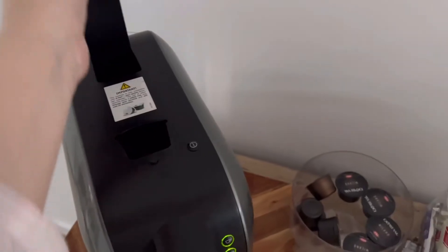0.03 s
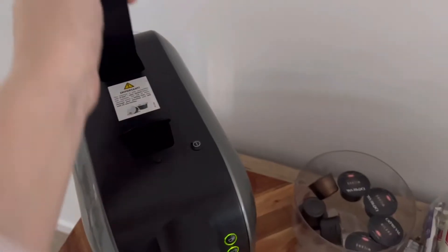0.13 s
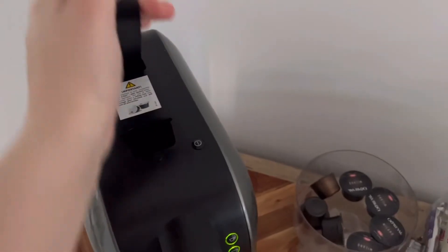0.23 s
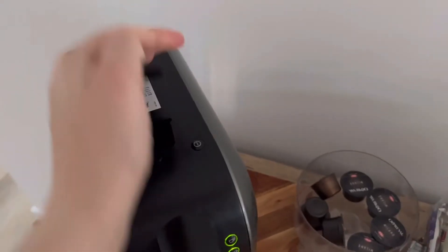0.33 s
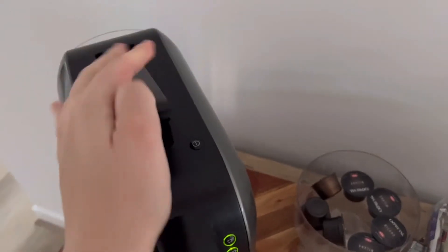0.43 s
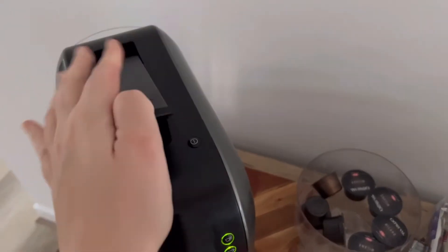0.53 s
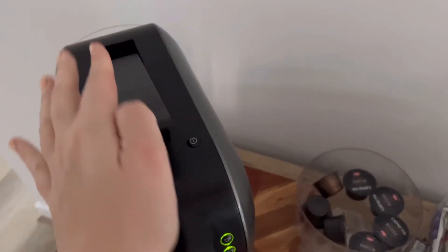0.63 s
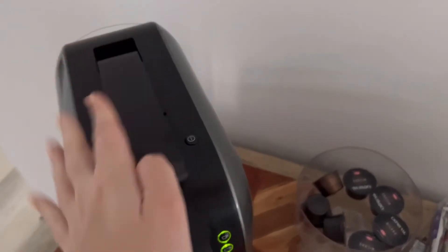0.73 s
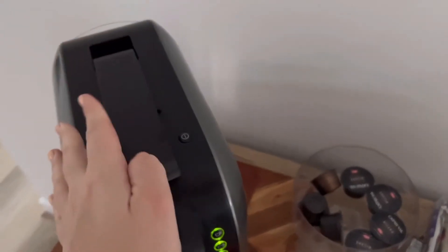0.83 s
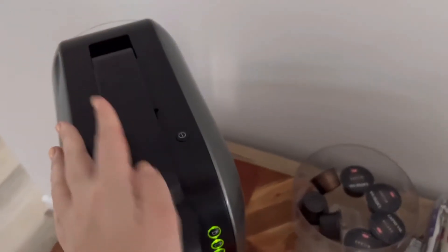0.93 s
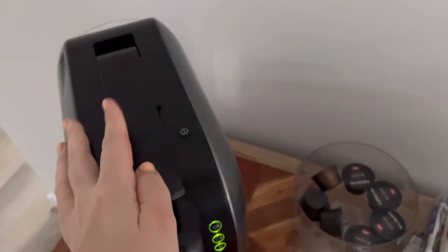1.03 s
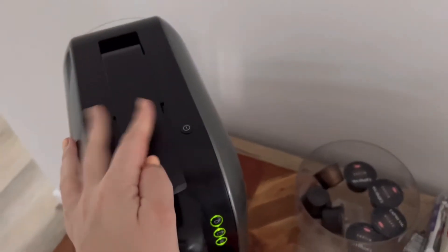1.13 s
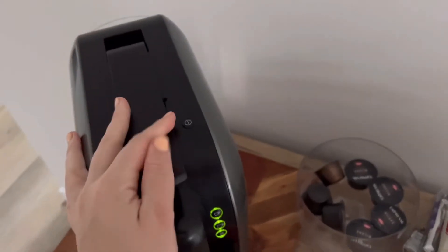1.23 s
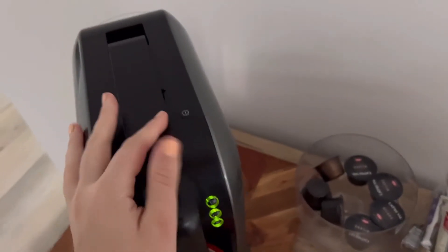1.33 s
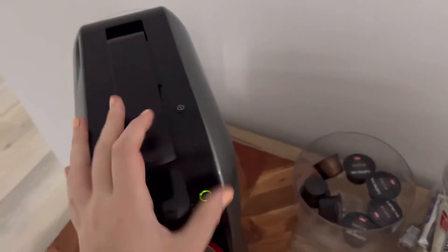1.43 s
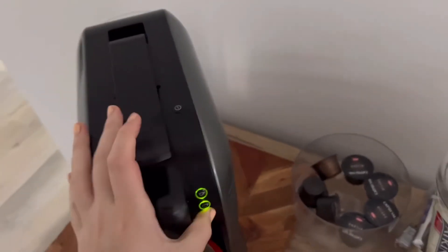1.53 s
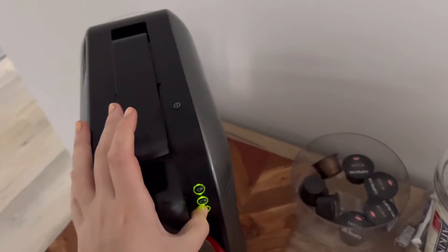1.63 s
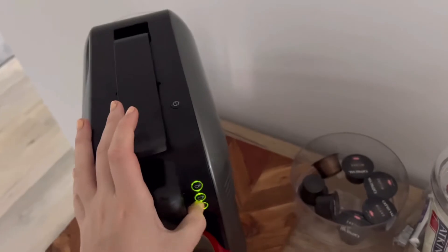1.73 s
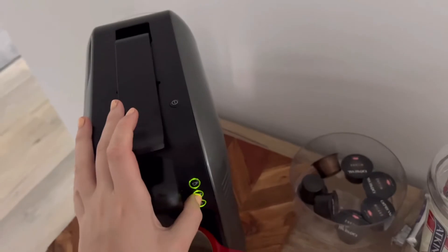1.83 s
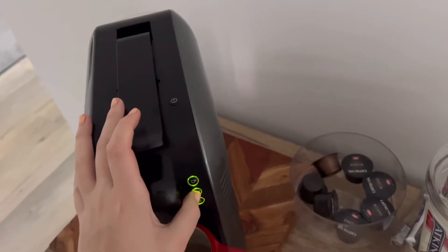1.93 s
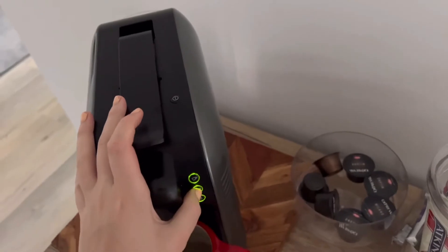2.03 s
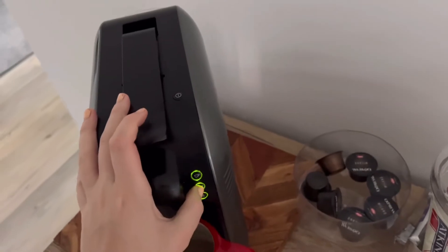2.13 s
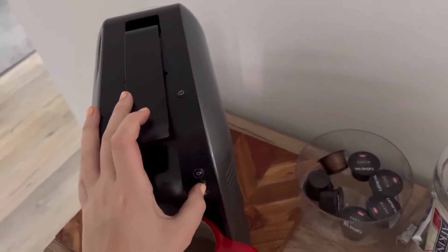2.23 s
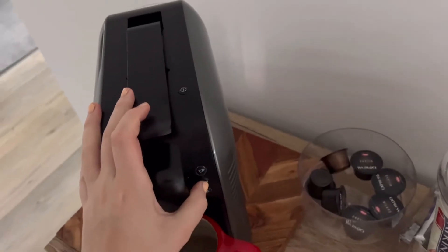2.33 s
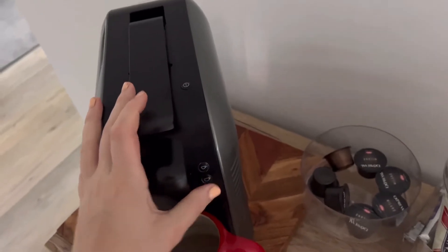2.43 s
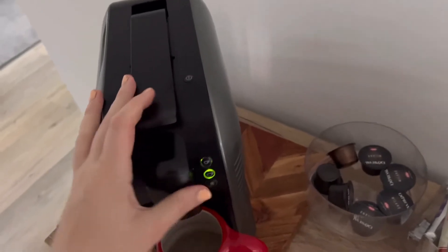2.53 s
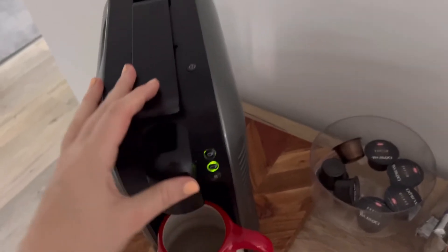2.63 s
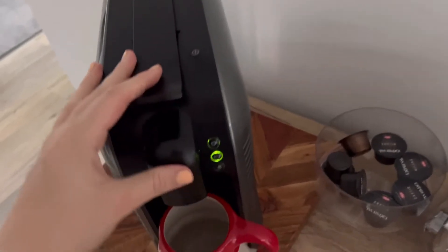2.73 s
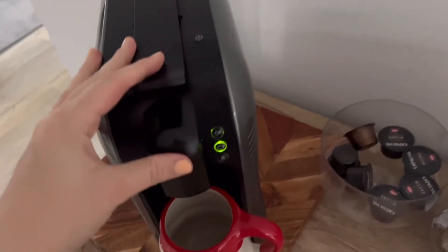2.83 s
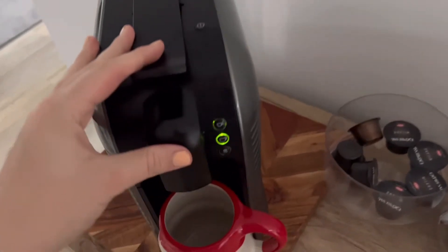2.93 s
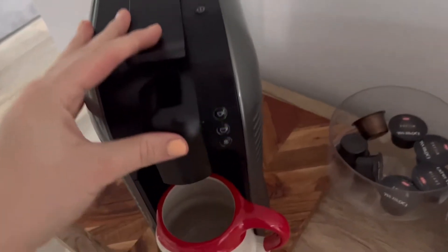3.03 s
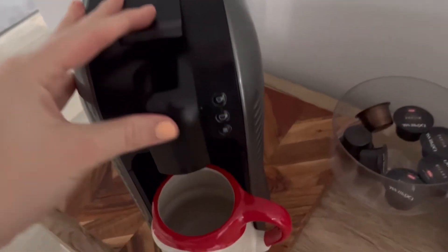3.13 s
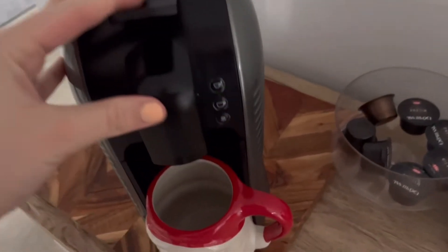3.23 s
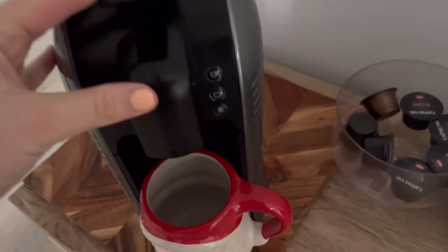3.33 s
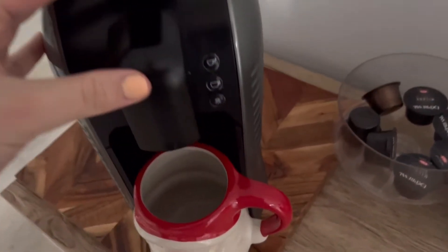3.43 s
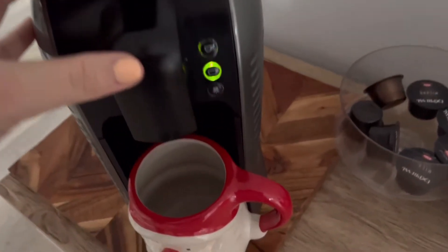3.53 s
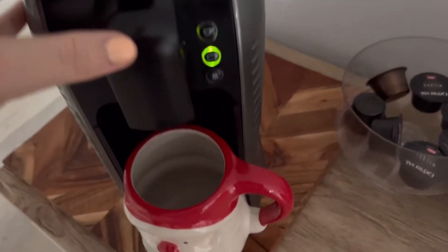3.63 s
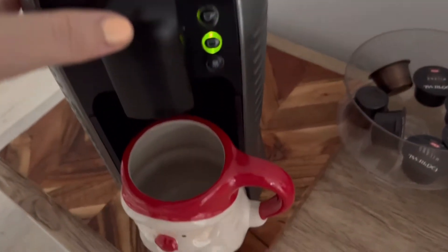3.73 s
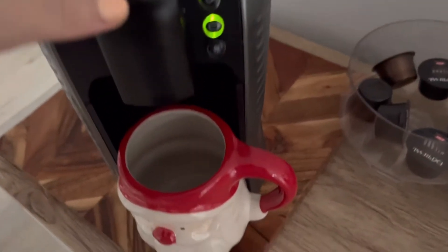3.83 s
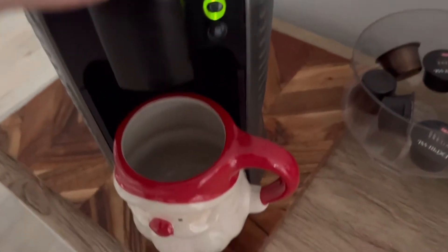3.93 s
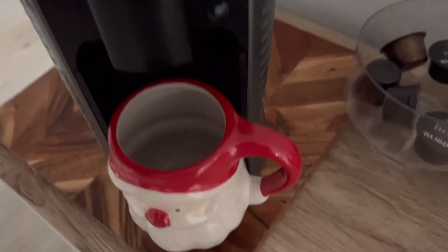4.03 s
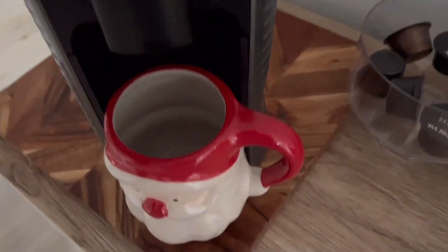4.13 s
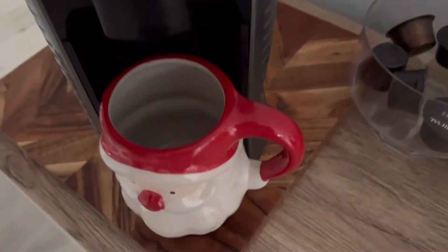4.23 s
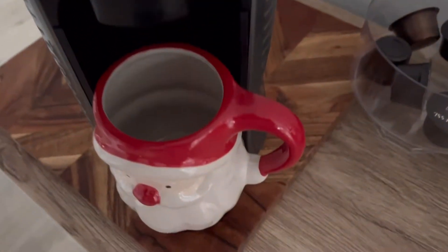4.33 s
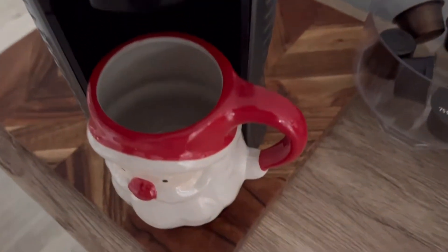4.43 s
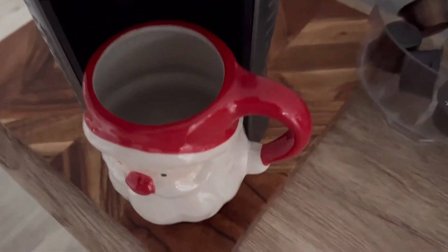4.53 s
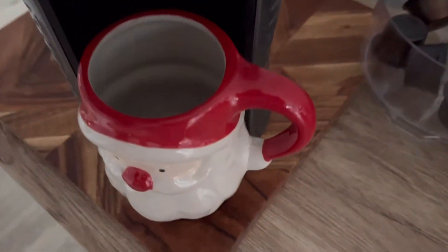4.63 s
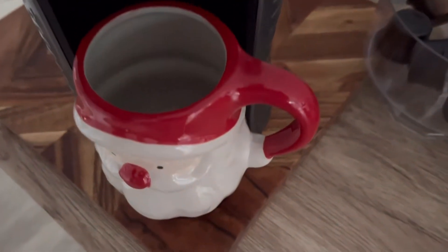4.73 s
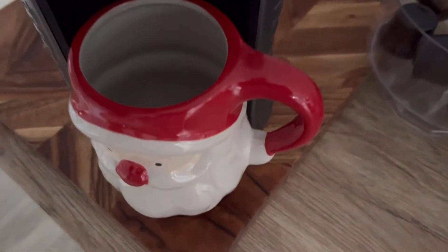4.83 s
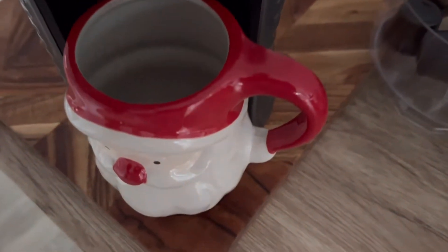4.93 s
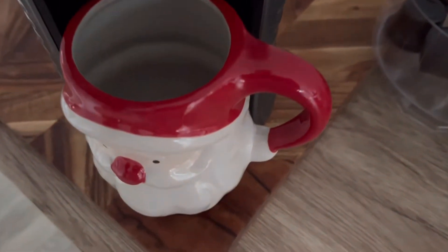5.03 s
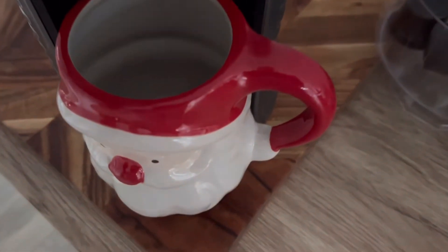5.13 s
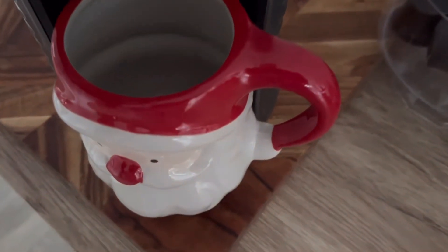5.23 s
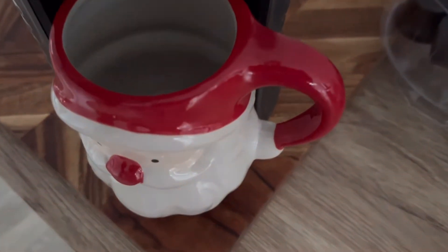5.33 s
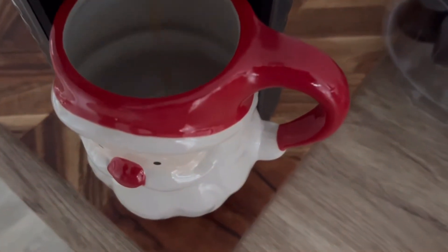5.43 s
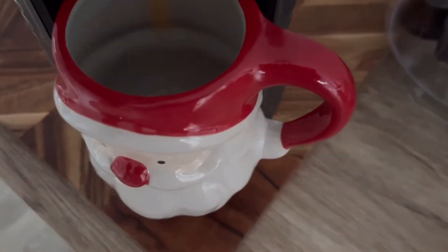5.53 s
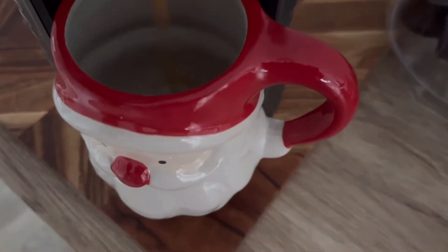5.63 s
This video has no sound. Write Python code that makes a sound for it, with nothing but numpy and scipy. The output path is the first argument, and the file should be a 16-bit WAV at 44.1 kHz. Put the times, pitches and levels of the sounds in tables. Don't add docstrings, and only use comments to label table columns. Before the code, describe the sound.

Close stereo phone pickup of a capsule machine: brief hinge rub, hard plastic latch clicks, hollow housing thumps and a heavy slam within about a second. Faint hand touches follow over low room rumble, then a soft button click. A mains-rate pump buzzes continuously, rattling and hissing with tiny squeaks, its tone shifting as the phone moves down to the cup; the bright kitchen echoes briefly.

```python
import sys
import numpy as np
from scipy import signal
from scipy.fft import rfft, irfft, next_fast_len
from scipy.io import wavfile
from scipy.ndimage import uniform_filter1d

SR = 44100
rng = np.random.default_rng(int(sys.argv[2]) if len(sys.argv) > 2 else 0)


def unload_audio(sound):
    columns = np.transpose(np.atleast_2d(sound))
    steps = np.round(np.clip(columns, -1, 1) * 32767)
    wavfile.write(sys.argv[1], SR, steps.astype(np.int16))


def voltage_ratio(decibels):
    exponent = np.asarray(decibels, float) / 20
    return 10 ** exponent


N = 250929
T = np.arange(N) / SR
MAINS_HZ = 50.052
AT_CUP_S = (4.3, 5.1)


def noise(size=N):
    return rng.standard_normal(size)


def curve(table, hz):
    points_hz, values = np.array(table).T
    return np.interp(np.log(hz + 1), np.log(points_hz), values)


def unit(x):
    return x / np.sqrt(np.mean(x ** 2))


def colour(x, table):
    n = next_fast_len(len(x), True)
    gain = voltage_ratio(curve(table, np.fft.rfftfreq(n, 1 / SR)))
    return irfft(rfft(x, n) * gain, n)[:len(x)]


def ring(x, hz, width_hz):
    r = np.exp(-np.pi * width_hz / SR)
    return signal.lfilter([1 - r, 0, r - 1], [1, -2 * r * np.cos(2 * np.pi * hz / SR), r * r], x)


def body(x, modes, widen):
    out = 0
    for k, (hz, width_hz, db) in enumerate(modes):
        out = out + (-1) ** k * voltage_ratio(db) * ring(x, hz, width_hz * widen)
    return out


def ramp(start_s, end_s):
    return np.clip((T - start_s) / (end_s - start_s), 0, 1)


def walk(rate_hz):
    step = 16
    k = int(SR / rate_hz / step)
    coarse = uniform_filter1d(uniform_filter1d(noise(N // step + 1), k), k)
    return np.interp(T, np.arange(len(coarse)) * step / SR, unit(coarse))


def burst(length_s):
    t = T[:8192] / np.clip(length_s, 3e-4, .05)
    return noise(len(t)) * (1 - np.exp(-t / 0.3)) * np.exp(-t)


def add(out, s, peak_db, x):
    i = int(s * SR)
    out[i:i + len(x)] += (x * voltage_ratio(peak_db) / np.abs(x).max())[:N - i]


# (time [s], air level [dB])
HANDLING = [(0.0, -45.5), (0.15, -50), (0.35, -33.5), (0.48, -55), (0.69, -43), (0.81, -49), (1.1, -35.5),
            (1.33, -52), (1.45, -58.5), (1.54, -65), (1.85, -65.5), (2.07, -64.5), (2.16, -50.5),
            (2.2, -49)]
# (frequency [Hz], density [dB per Hz])
AIR = [(88, -21.5), (150, -3), (194, -6), (522, -14), (1430, -27), (1920, -28.5), (3090, -38.5),
       (8170, -41.5), (10200, -62), (12000, -57.5), (15600, -80.5), (22000, -120)]
# (time [s], frequency [Hz])
MOTOR = [
    (0, 56.8),
    (.4, 55.8),
    (.8, 57.6),
    (1.06, 59.9),
]


def murmur():
    released = ramp(1.45, 1.54)
    air_db = np.interp(T, *np.transpose(HANDLING))
    rumble_db = -52.5 + 0.091 * (air_db - air_db.min())
    rumble_db = rumble_db + 6 * (1 - released) - 14 * ramp(2.05, 2.16)
    motor_hz = np.interp(T, *np.transpose(MOTOR))
    rumble = unit(np.sin(2 * np.pi * np.cumsum(motor_hz) / SR) * voltage_ratio(2.2 * walk(9)))
    for hz, width_hz, db in [(84, 70, -7), (36, 25, -12)]:
        rumble += voltage_ratio(db) * unit(ring(ring(noise(), hz, width_hz), hz, width_hz))
    mid, side = (unit(colour(noise(), AIR)) * voltage_ratio(1.6 * walk(4)) for _ in range(2))
    side = signal.sosfilt(signal.butter(1, 900, "high", fs=SR, output="sos"), side)
    air = mid + .9 * side * np.array([[1], [-1]])
    treble = signal.sosfilt(signal.butter(2, 2400, "high", fs=SR, output="sos"), air)
    air += (voltage_ratio(-3.5 * released) - 1) * treble
    port_db = np.array([[-.9], [.9]])
    return voltage_ratio(rumble_db + port_db) * rumble + voltage_ratio(air_db) * air


# (frequency [Hz], width [Hz], level [dB])
HINGE = [(278, 14, 26), (2640, 80, 1), (4110, 90, -13), (6375, 400, -9), (7520, 160, -14)]


def hinge():
    return voltage_ratio(-52 + 3.86 * walk(38)) * (T < 0.182) * unit(body(noise(), HINGE, 0.88))


def thuds(events, ring_t60_s, push_s):
    out = np.zeros(N)
    t = T[:16384]
    width_hz = np.log(1000) / np.pi / ring_t60_s
    for s, db, hz in events:
        push = np.exp(-(t / push_s - 1) ** 2 * 4) * np.cos(2 * np.pi * hz * t)
        push[:8192] += 0.63 * ring(burst(2 * push_s), 380, 600)
        panel = ring(push, hz, width_hz)
        panel += 0.32 * ring(push, 1.6 * hz, 55) + 0.03 * ring(push, 4.8 * hz, 120)
        add(out, s, db + 0.24, panel)
    return out


# (time [s], peak level [dB], ring frequency [Hz])
ROCKS = [(0.009, -37, 269), (0.579, -52.5, 148), (0.791, -24, 186.9), (1.021, -21, 193.8),
         (1.114, -15, 185.7), (1.19, -24.5, 180.3), (1.246, -31, 198.4), (1.739, -58.5, 151.1),
         (1.836, -61, 156.1), (1.935, -62.5, 154.3), (2.116, -34.5, 126.6), (2.21, -26.5, 196.3),
         (2.291, -32, 202.3)]
# (time [s], peak level [dB], ring frequency [Hz])
KNOCKS = [(0.173, -30, 396.7), (0.195, -24.5, 270), (0.266, -22, 371), (0.272, -28, 646),
          (0.284, -19, 360.6), (0.296, -29.5, 705.5), (0.308, -28.5, 391.5), (0.349, -20, 244),
          (0.4, -32.5, 235), (0.57, -32, 102), (0.645, -27.5, 194), (0.666, -16, 371), (0.673, -13, 299.2),
          (0.679, -15, 362), (0.687, -14, 283), (0.7, -19.5, 263.7), (0.741, -24.5, 75),
          (0.724, -27.5, 331), (0.728, -30, 488.7), (0.737, -21.5, 105), (1.075, -30, 350),
          (1.16, -29.5, 383.8), (0.875, -35, 361.7), (0.999, -22, 181), (1.03, -24.5, 70.7),
          (1.143, -25.5, 78.8), (1.308, -32, 227.5), (1.386, -37.5, 78.9), (2.101, -38, 504),
          (2.11, -36.5, 361), (2.119, -32.5, 252), (2.184, -20.5, 378.4), (2.226, -23.5, 399.5),
          (2.328, -26, 262), (2.367, -26, 249.5)]
# (time [s], peak level [dB], ring frequency [Hz])
TOUCHES = [(0.683, -20.5, 124.4), (0.345, -29.5, 120), (0.805, -28.5, 190), (1.405, -41, 340),
           (1.476, -49.5, 479.2), (1.725, -54.5, 399.7), (1.765, -52.5, 373), (1.795, -52.5, 360.3),
           (2.03, -59, 650), (0.565, -38, 400), (1.04, -35, 270), (1.09, -36, 480), (1.122, -33, 360),
           (1.2, -42, 600)]
# (time [s], peak level [dB], ring frequency [Hz])
SLAMS = [
    (0.9221, 3, 256.7),
    (0.939, -10.5, 109),
    (0.944, -9.5, 228.2),
    (0.962, -12.5, 300),
    (0.98, -18.5, 309.7),
]


def knocks():
    dull = thuds(ROCKS, ring_t60_s=.11, push_s=.006)
    dull += thuds(KNOCKS, ring_t60_s=.052, push_s=.0035)
    dull += thuds(TOUCHES, ring_t60_s=.052, push_s=.0035)
    dull += thuds(SLAMS, ring_t60_s=.024, push_s=.004)
    return colour(dull, [(1200, -2.0), (3000, -23.5)])


# (frequency [Hz], density [dB per Hz])
SHELL = [(290, -31), (500, -7), (2380, -17), (2630, -13.5), (3950, -17.5), (4300, -17), (6740, -13),
         (7240, -21.5), (8740, -17), (9950, -32), (11500, -25.5), (13900, -43.5), (15800, -28.5)]


def clicks(events, rings):
    near, wash = np.zeros((2, N))
    lead = 64
    for s, db, treble_db, length_s in events:
        tilt = [(600, 0.0083), (3000, 0.0028), (6000, treble_db + 4.0), (16000, treble_db + 9.5)]
        puff = colour(np.roll(burst(length_s), lead), SHELL)
        add(near, s - lead / SR, db - 0.5, colour(puff + 0.9 * body(puff, rings, 0.35), tilt))
        impulse = colour(signal.unit_impulse(1024, lead), SHELL)
        add(wash, s - lead / SR, db + 0.33, colour(impulse, tilt))
    return near, wash


# (time [s], peak level [dB], treble [dB], length [s])
CRACKS = [(0.017, -48.5, -16, 0.0039), (0.165, -38.5, -21, 0.0035), (0.179, -39.5, -23, 0.0056),
          (0.22, -31.5, -14, 0.00186), (0.247, -44, -35, 0.0032), (0.253, -34.5, -43.5, 0.0106),
          (0.266, -21, -16, 0.0096), (0.275, -29, -25, 0.0081), (0.534, -52, -28.5, 0.0021),
          (0.562, -32, -21, 0.0043), (0.644, -41.5, -34, 0.004), (0.664, -17.5, -11.5, 0.0072),
          (0.669, -25, -10.5, 0.0078), (0.851, -45, -25, 0.0055), (0.888, -57.5, 24, 0.0038),
          (0.293, -28.5, -4, 0.0046), (0.91, -30, -4, 0.0074), (0.919, -2, -0.5, 0.00298),
          (0.923, -6.5, -16.5, 0.0035), (1.109, -37.5, -39, 0.0047), (1.312, -42, -30, 0.002),
          (1.577, -59.5, -5, 0.00403), (1.735, -46, -14.5, 0.00926), (1.759, -53, -21.5, 0.0155),
          (2.185, -33, -27.5, 0.0037), (2.296, -30.5, -20.5, 0.0042), (2.845, -29, -10, 0.0078),
          (3.189, -51, -5, 0.0016), (4.102, -26, -4, 0.00384), (5.579, -28, -2, 0.004)]
# (frequency [Hz], width [Hz], level [dB])
PANELS = [(513.5, 48, -1), (853.4, 38, 4.5), (1010, 13, -8), (1250, 75, -6), (1420, 32, -1),
          (1646, 33, -9.5)]


def cracks():
    return clicks(CRACKS, PANELS)


# (time [s], peak level [dB], ring frequency [Hz])
PINGS = [(0.271, -27, 898), (0.322, -22, 784), (0.641, -31.5, 810), (0.666, -19, 842), (0.666, -23, 1420),
         (0.675, -31.5, 1420), (0.69, -29.5, 1010), (0.919, -13, 535), (0.919, -16.5, 852),
         (0.917, -17.5, 1250), (0.946, -23.5, 691), (0.963, -23, 612), (1.108, -31.5, 990),
         (1.118, -29, 705), (1.311, -44.5, 800), (2.101, -34.5, 1988), (2.106, -36.5, 2150),
         (2.2992, -37, 2115), (3.568, -40, 2900), (3.8281, -30, 2530), (4.107, -27, 2505)]


def pings():
    out = np.zeros(N)
    for s, db, hz in PINGS:
        add(out, s, db - 4.5, ring(ring(burst(0.0027), hz, 62), hz, 520))
    return out


# (time [s], peak level [dB], scrape length [s])
SNAPS = [
    (0.294, -27.5, 0.00124),
    (0.3191, -4.5, 0.000497),
    (0.3357, -3, 0.000275),
    (0.361, -23, 0.0006),
    (0.376, -20, 0.000294),
]
# (frequency [Hz], width [Hz], level [dB])
LATCH = [(758, 67, -14.5), (1655, 110, -7.5), (2404, 250, -14.5), (2770, 357.6, 1.5), (2859, 515, 0.5),
         (3477, 780, -14.5), (4960, 500, -25.5), (5897, 200, -14.5), (6466, 190, -16.5), (8120, 150, -19.5),
         (8700, 300, -18.5), (11330, 500, -24), (12800, 460, -29.5), (14240, 360, -26.5)]
# (frequency [Hz], width [Hz], level [dB])
SPRING = [(1600, 120, -15), (2306, 41, -3), (2637, 80, -1), (2855, 60, 1), (2995, 140, -2)]
# (frequency [Hz], density [dB per Hz])
LATCH_ECHO = [(350, -41.5), (600, -11), (1000, -26), (1560, -11), (1910, -16), (2900, -6), (3900, -23),
              (6080, -11), (9110, -16), (10200, -46.5), (11600, -21), (13800, -51.5), (15000, -36.5)]


def latch_snaps():
    near, wash = np.zeros((2, N))
    lead = 256
    fade = voltage_ratio(-60 * T[:SR // 2])
    for s, db, length_s in SNAPS:
        add(near, s, db - 0.5, body(burst(length_s), LATCH, 0.65))
        add(near, s, db - 26, body(noise(SR // 2) * fade, SPRING, 1.1))
        add(wash, s - lead / SR, db, colour(signal.unit_impulse(2048, lead), LATCH_ECHO))
    return near, wash


# (frequency [Hz], width [Hz], level [dB])
CREAK = [(1890, 100, 0), (3350, 130, 0)]


def button_creak():
    return voltage_ratio(-75) * ramp(1.944, 2.1) * (T < 2.1) * unit(body(noise(), CREAK, 0.92))


# (time [s], peak level [dB], treble [dB], length [s])
BUTTON = [
    (2.101, -28.5, -10.5, 0.0047),
    (2.104, -39, -26, 0.0096),
]


def button_click():
    return clicks(BUTTON, [(2100, 350, 0)])


# (time [s], count [strokes])
WEAK = [(2.39, 1), (2.49, 1), (2.61, 1), (2.65, 1), (2.69, 1), (2.77, 1), (2.91, 1), (3.15, 3), (3.25, 2),
        (3.49, 2), (3.6, 1), (3.64, 1), (3.72, 1), (4.2, 1), (4.36, 2), (4.44, 1), (4.9, 1), (5.06, 1),
        (5.1, 1), (5.6, 1)]


def strokes(parts):
    turns = MAINS_HZ * T - .32 + 1
    blow, stroke = turns % 1, turns.astype(int)
    strength = noise((stroke.max() + 1, parts + 1))
    hit_db = .7 * strength[:, -1]
    for s, count in WEAK:
        hit_db[stroke[int(s * SR) + 260] + np.arange(count)] -= 20
    gate = np.minimum(blow / .13, 1) * np.exp(-(blow / .36) ** 2) * voltage_ratio(hit_db[stroke])
    shake = voltage_ratio(1.3 * uniform_filter1d(strength, 3, axis=0)[stroke].T * 2)
    return blow, stroke, gate, shake


# (multiple of stroke rate, level [dB])
BREWING = [(1, -3.5), (2, -12.5), (3, 0), (4, -6.5), (5, 0.5), (6, -4), (7, -1), (8, -1), (9, -5), (10, -7),
           (11, -8), (12, -4.5), (13, -5), (14, -16), (15, -15), (16, -15), (17, -17.5), (18, -20),
           (19, -12), (20, -18.5), (21, -14.5), (22, -44), (23, -14), (24, -20)]
# (frequency [Hz], level [dB])
PRIMING = [(50, 0), (250, -1), (370, 2.5), (500, -0.5), (620, -2.5), (800, 0.45), (950, -3), (1080, -15.5)]
# (frequency [Hz], level [dB])
PRESSING = [(50, -2), (110, 6.5), (150, 1.5), (225, -11.5), (310, -2), (420, -0.5), (800, 0.16), (1000, -1)]
# (time [s], multiple of
# stroke rate, level [dB], span [s])
FADES = [(2.28, 1, -6, .1), (2.26, 3, -5.5, 0.172), (2.3, 4, 7, 0.117), (2.32, 5, -2.5, 0.094),
         (2.328, 8, -8, 0.28), (2.6, 5, -6.5, 0.122), (2.87, 6, -3.5, 0.46), (2.73, 15, 5, 0.19),
         (2.63, 16, 3.5, 0.132), (2.92, 11, -9, 0.11), (3.23, 8, 2, 0.247), (3.46, 17, -14.5, 0.353),
         (3.69, 11, -21.5, 0.298), (3.57, 4, 3.5, 0.31), (3.52, 14, 5, 0.83), (3.75, 20, 9, 0.36),
         (3.72, 22, 8, 0.195), (3.65, 21, 5, 0.34), (3.215, 20, 5.5, 0.147), (4.09, 17, 5, 0.206),
         (4.22, 19, -5.5, 0.29), (4.103, 8, -4, 0.25), (4.036, 7, -2.5, 0.32), (4.3, 6, 4.5, 0.104),
         (4.393, 10, -10, 0.18), (4.404, 11, 3.5, 0.178), (4.78, 12, -4.5, 0.164), (3.64, 11, -1.5, .12),
         (4.65, 4, -12.5, 0.143), (4.66, 14, -13, 0.36), (5.06, 18, -25, 0.46), (5.55, 5, -5, .15),
         (5.5, 14, -6, .2), (5.48, 16, 7, 0.64), (4.98, 22, 20, 0.57)]
GULPS_S = [
    2.63,
    2.95,
    3.25,
    3.45,
    4.72,
]


def hum(start_s):
    early, late, out = 1 - ramp(2.9, 3.9), ramp(*AT_CUP_S), 0
    rough = 0.055 + 0.26 * np.exp(-np.maximum(T - start_s, 0) / 0.21)
    rough += .13 * sum(np.exp(-((T - gulp_s) / .03) ** 2) for gulp_s in GULPS_S)
    slow = T[::256]
    for order, line_db in BREWING:
        hz = order * MAINS_HZ
        fades_db = np.zeros(len(slow))
        for s, line, fade_db, span_s in FADES:
            if round(line) == order:
                fades_db += fade_db * np.exp(-((slow - s) / span_s) ** 2)
        db = line_db + early * curve(PRIMING, hz) + late * curve(PRESSING, hz)
        db = db + np.interp(T, slow, fades_db)
        lag = order / 2 - .22 if order < 14 else order * .37 + .2
        lag += .45 * (order == 6) - .17 * (6 < order < 12) - .17 * (order == 1)
        lag += .22 * (order in (2, 19, 20)) + .1 * (order in (4, 9))
        lag = lag + .04 * noise(None) + .03 * walk(2.5)
        lag = lag + .02 * order * (order > 9) * late + .22 * late * (order in (4, 8))
        lag = lag + .12 * early * (int(order == 3) - int(order > 13))
        smear = rough * min(order / 2.7, 1) ** 2.5 * (walk(130) + 1j * walk(90))
        line = np.real((1 + smear) * np.exp(2j * np.pi * (hz * T - lag)))
        out = out + voltage_ratio(db + 0.34 * walk(8.3)) * line
    return out / np.sqrt(uniform_filter1d(out ** 2, size=SR // 5))


# (frequency [Hz], width [Hz], level [dB], frequency from the cup [Hz])
RATTLE = [(1661, 44, -3, 1600), (1923.6, 35, -3.5, 1950), (2591, 90, 4, 2640), (3060, 360, -8.5, 2673),
          (3280, 84.4, 0.5, 3290), (3660, 137, -3.5, 3509), (3933.5, 99, -1, 3300), (4332, 110, -5.5, 4200),
          (5450, 150, -13, 4800)]


def rattle(blow, gate, shake):
    same = noise(1024)[(blow * SR / MAINS_HZ).astype(int)]
    out, late = 0, ramp(*AT_CUP_S)
    for k, (hz, width_hz, db, cup_hz) in enumerate(RATTLE):
        jolt = gate * shake[k] * 0.7 * same + (1.05 * gate + 0.09) * noise()
        early_ring = ring(jolt * np.sqrt(1 - late), hz, width_hz)
        out = out + voltage_ratio(db) * (early_ring + ring(jolt * np.sqrt(late), cup_hz, width_hz))
    return unit(ring(out, 3300, 6000))


# (frequency [Hz], density [dB per Hz])
HISS = [(590, -29.5), (1000, -1.5), (1370, -5), (2100, -11.5), (2590, -8.5), (4020, -9), (5020, -15),
        (8360, -10.5), (9380, -11.5), (9800, -32.5), (10500, -30.5), (11700, -20), (12800, -24.5),
        (13900, -31), (14600, -23), (16000, -33)]


def valve_hiss(blow, gate, shake, pressure):
    back = np.exp(-((blow - .68) % 1) / 0.84)
    hiss = colour((gate + 1.54 * back + 0.24) * noise(), HISS)
    low = colour(hiss, [(9900, 0), (10300, -60)])
    top = colour(hiss * (.65 + gate * shake[0]), [(9900, -60), (10300, 0)])
    highest = colour(top, [(13600, -60), (14000, 0)])
    top += (voltage_ratio(5 - 7 * ramp(4.85, 5.0)) - 1) * highest
    top_db = -58.5 + 7 * np.exp(-((T - 3.96) / 0.616) ** 2)
    return voltage_ratio(-50.5 + 6.5 * pressure) * unit(low) + voltage_ratio(top_db) * unit(top)


SQUEAKS_S = [
    3.11,
    3.25,
    3.27,
    3.47,
    3.49,
    3.51,
    3.55,
    3.57,
    3.71,
    3.79,
]


def squeak(blow, stroke):
    size = voltage_ratio(5 * noise(stroke.max() + 1))
    size[stroke[(np.array(SQUEAKS_S) * SR).astype(int)]] = voltage_ratio(11)
    hz = 2929 + 350 * np.clip((blow - .2) / 0.44, 0, 1) + 60 * walk(5)
    chirp = np.exp(-((blow - .4) / 0.214) ** 2) * np.sin(2 * np.pi * np.cumsum(hz) / SR)
    return voltage_ratio(-60) * unit(size[stroke] * chirp)


def spout_flow():
    water = 0
    for hz in (2260, 2700, 2900, 3050):
        water = water + voltage_ratio(2.1 * walk(14)) * ring(noise(), hz, 120)
    return voltage_ratio(-47.5) * ramp(5.2, 5.34) ** 2 * unit(ring(water, 2850, 900))


# (time [s], hum level [dB], pressure [0-1])
PUMP = [
    (2.179, -50, 0.75),
    (2.211, -30.5, 0.34),
    (2.54, -32, 0.03),
    (3.44, -30.5, 0.34),
    (4.3, -30.5, 0.33),
    (5.69, -30, 0.93),
]


def pump():
    s, *columns = np.transpose(PUMP)
    hum_db, pressure = (np.interp(T, s, c) for c in columns)
    blow, stroke, gate, shake = strokes(len(RATTLE))
    clatter = voltage_ratio(-48.5 + 3.5 * pressure) * rattle(blow, gate, shake)
    water = valve_hiss(blow, gate, shake, pressure) + squeak(blow, stroke) + spout_flow()
    shudder = voltage_ratio(-25) * unit(ring(ring(noise(), 74.5, 40), 74.5, 40))
    on = np.clip((T - s[0] + 0.003) / 0.0068, 0, 1)
    return on * voltage_ratio(hum_db) * (hum(s[0]) + shudder), on * (clatter + water)


# (frequency [Hz], level [dB])
TILES = [(90, -17), (400, 1), (1500, 7.5), (4000, -1), (12000, -9)]
# (frequency [Hz], t60 [s])
TAIL = [(100, 1), (500, 0.16), (2800, 0.59), (8000, 0.26), (14000, 0.97)]


def kitchen(x):
    t = T[:SR]
    tail = 0
    for hz in 90 * 2. ** np.arange(8):
        fade = voltage_ratio(-60 * t / curve(TAIL, hz) + curve(TILES, hz))
        mid, side = ring(noise((2, SR)), hz, hz * 1.1) * fade
        tail = tail + mid + min(.12 + hz / 1300, 1) * side * np.array([[1], [-1]])
    tail = tail * np.minimum(t / 0.004, 1)
    return signal.fftconvolve(x[None], tail / np.sqrt(np.sum(tail ** 2) / 2), axes=1)[:, :N]


def ports(x, balance, phase):
    n = next_fast_len(N, True)
    hz = np.fft.rfftfreq(n, 1 / SR)
    half = voltage_ratio(curve(balance, hz) / 2) * np.exp(.5j * np.interp(hz, *np.transpose(phase)))
    return irfft(rfft(x, n) * np.array([half, 1 / half]), n)[:, :N]


# (frequency [Hz], level [dB])
LEVER_BALANCE = [(60, 3), (110, -2.5), (200, -0.5), (380, -1), (700, 2.5), (1290, 7), (2380, 6), (4400, 11),
                 (8120, -8.5), (15000, -2)]
PUMP_BALANCE = [(60, -1.5), (110, -4), (200, -3.5), (380, 2), (700, 2), (1290, 9.5), (2380, 0.5),
                (4400, 5.5), (8120, -1), (15000, 0.5)]
# (frequency [Hz], phase [rad])
LEVER_PHASE = [(0, 0), (860, 0.9), (1380, -1.1), (3530, 1.6), (4910, 4.9), (6630, 6.4), (7840, 7.9),
               (9730, 3.5), (10900, 2.4), (11400, 0.4), (12700, -0.4), (13200, -2.1), (15300, -6.1),
               (16500, -5.9)]
PUMP_PHASE = [(0, 0), (690, 0.4), (1550, 4.8), (2580, 7.8), (4310, 6.4), (8010, 7.0), (9650, 3.6),
              (10900, 2.6), (11800, -0.2), (12700, 0.1), (13200, -2.9), (14400, -3.3), (15000, -6.3),
              (16500, -6.3)]


def scene():
    background = murmur() + hinge() + button_creak()
    dull = knocks()
    crack, crack_wash = cracks()
    latch, latch_wash = latch_snaps()
    latch += pings()
    click, click_wash = button_click()
    sharp = crack + click
    wash = crack_wash + latch_wash + click_wash
    lines, hiss = pump()
    near = ports(latch + sharp + dull, LEVER_BALANCE, LEVER_PHASE)
    near += ports(lines + hiss, PUMP_BALANCE, PUMP_PHASE)
    to_room = latch / 10 + voltage_ratio(-23) * sharp + voltage_ratio(-3.5) * wash + voltage_ratio(-7.0) * dull
    to_room += lines / 10 + hiss / 4
    return near + kitchen(to_room) + background


def low_pass(x):
    return signal.sosfilt(signal.butter(12, 16980, fs=SR, output="sos"), x)


# (frequency [Hz], level [dB])
MIC = [(20, -14), (45, -2), (9200, 0), (9700, -6), (10600, -6), (11000, 4), (12800, -5), (13300, -18),
       (14300, -16), (14600, 2), (15700, -1), (16000, -30), (16500, -45.5)]
# (frequency [Hz], level [dB])
WIDE = [(1500, 1), (4000, 2.5), (12000, 2.5)]


def record(dry):
    mid = colour((dry[0] + dry[1]) / 2, MIC)
    side = colour(colour((dry[0] - dry[1]) / 2, MIC), WIDE)
    heard = np.array([mid + side, mid - side])
    soft = heard / (1 + np.abs(heard / .97) ** 6) ** (1 / 6)
    return low_pass(soft)


dry = scene()
out = record(dry)
unload_audio(out)
```